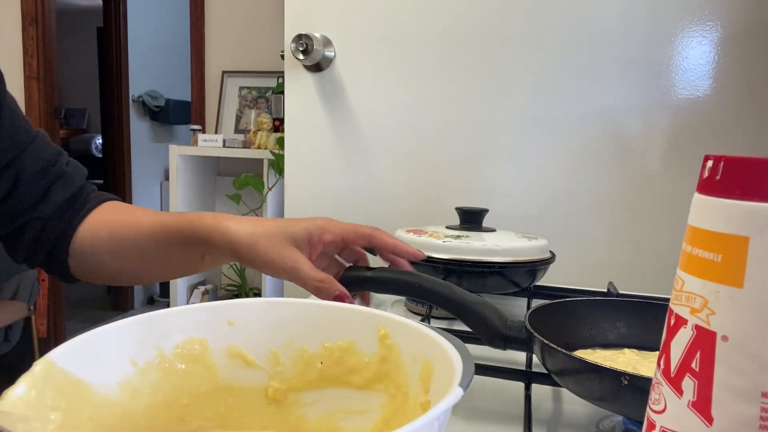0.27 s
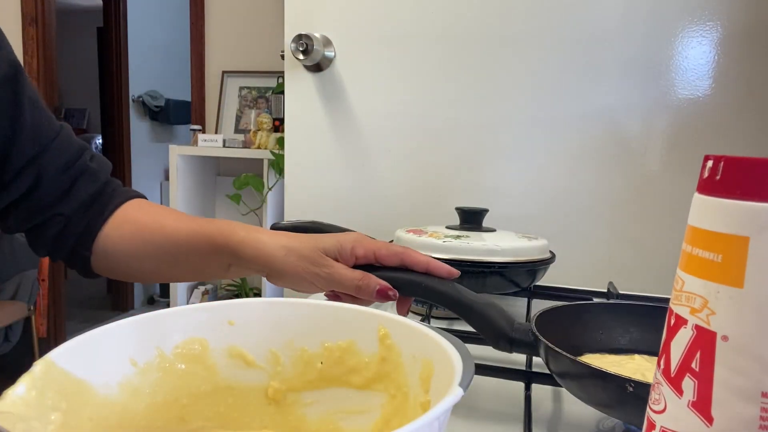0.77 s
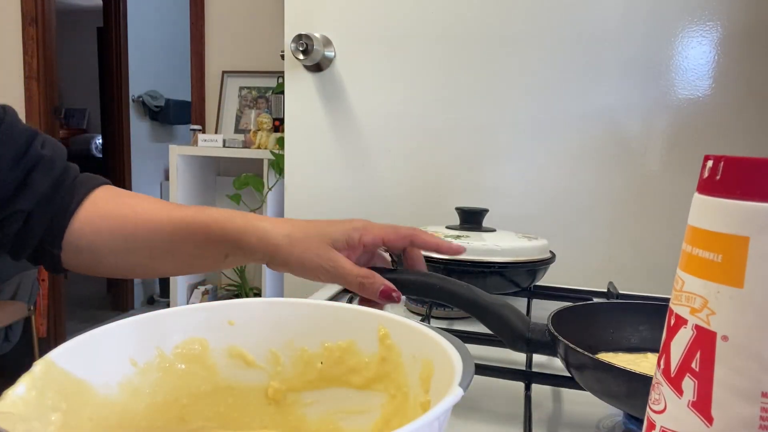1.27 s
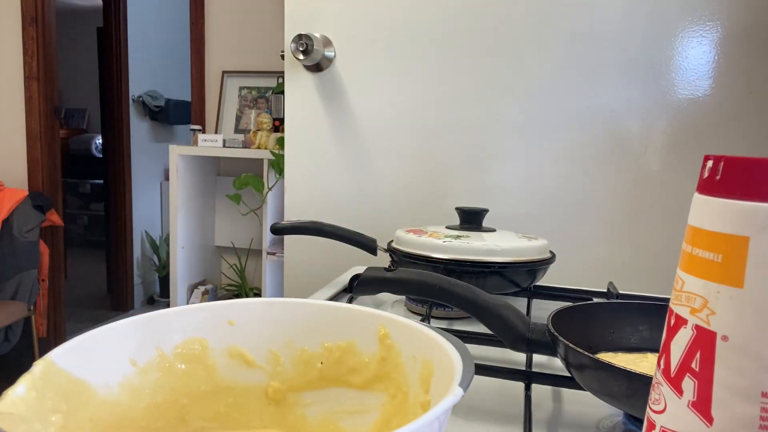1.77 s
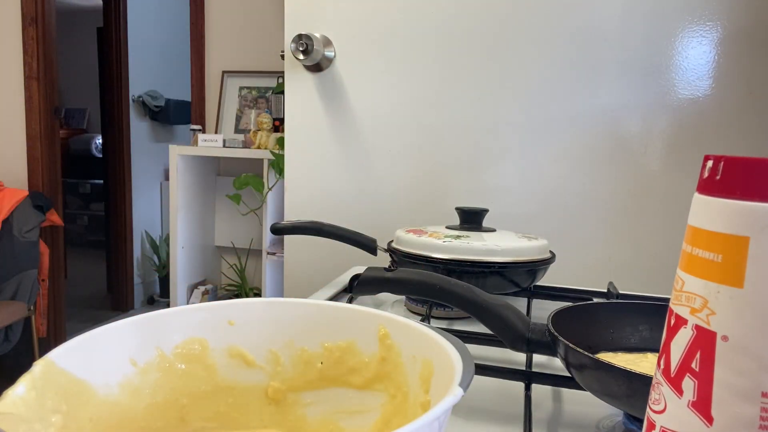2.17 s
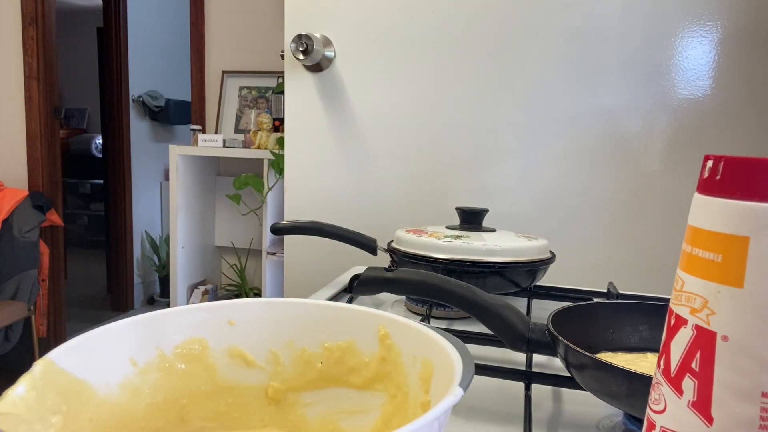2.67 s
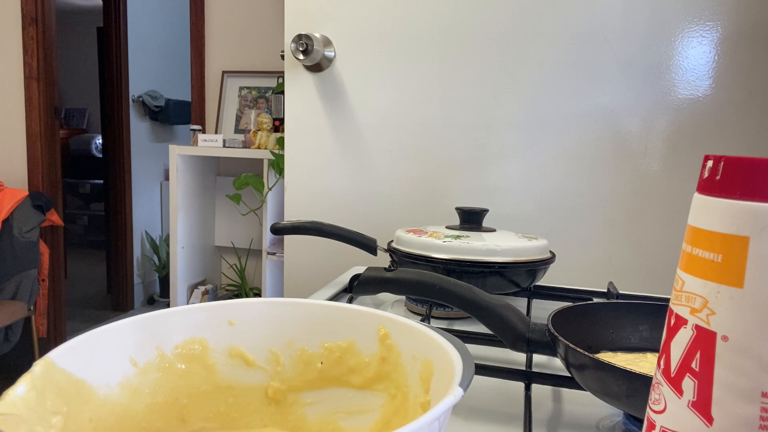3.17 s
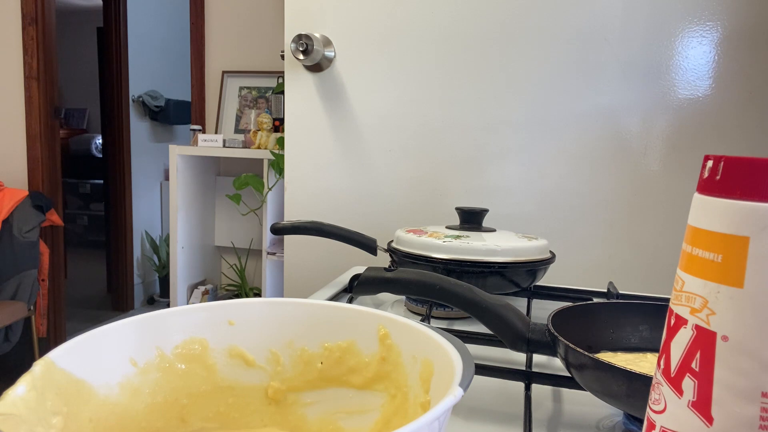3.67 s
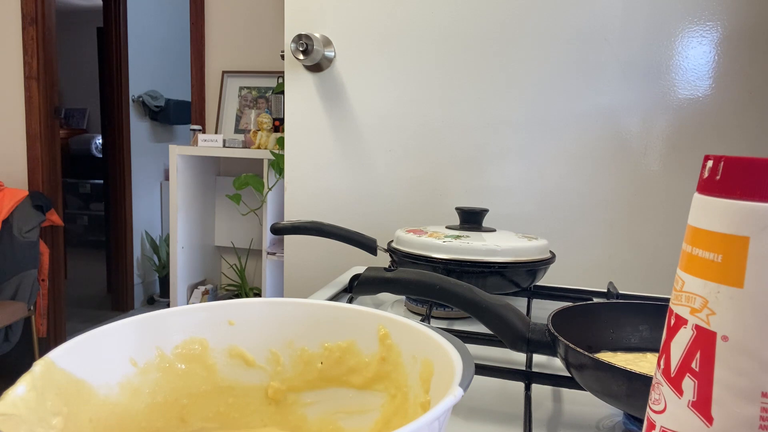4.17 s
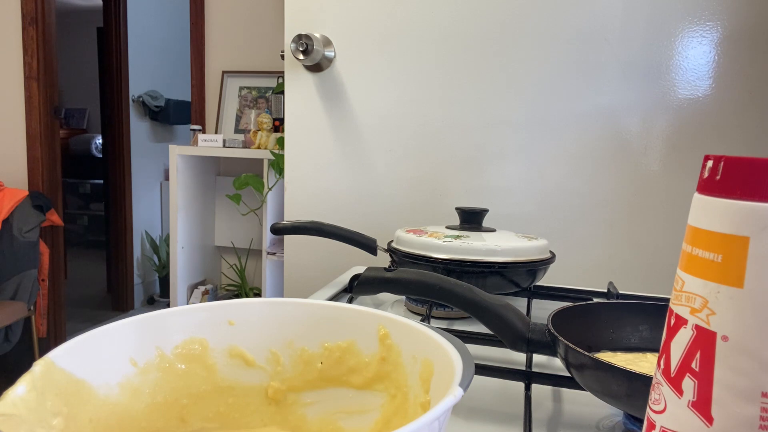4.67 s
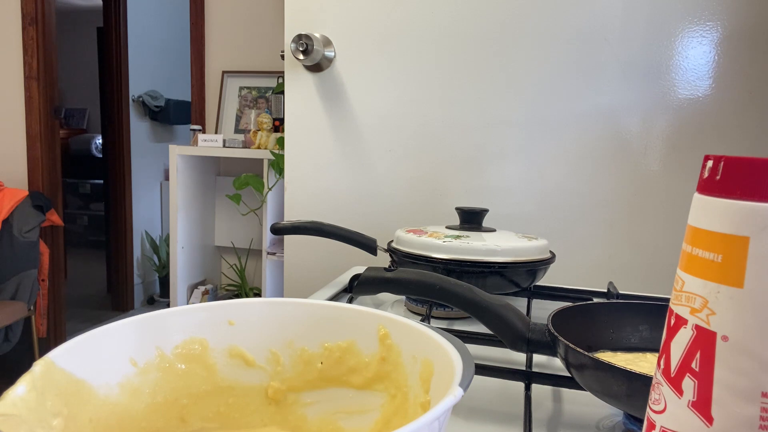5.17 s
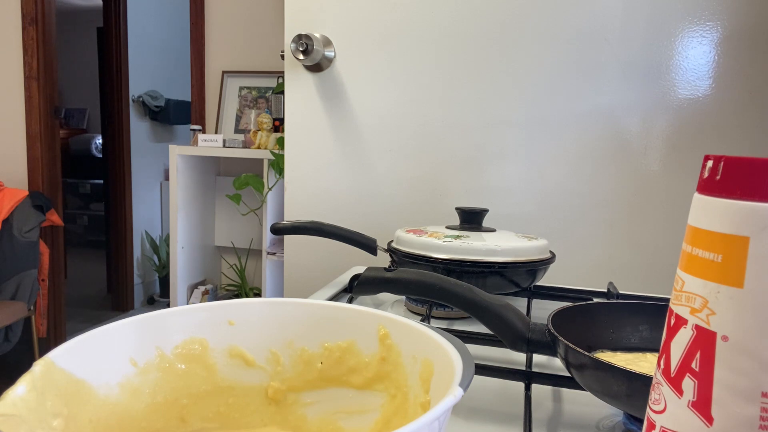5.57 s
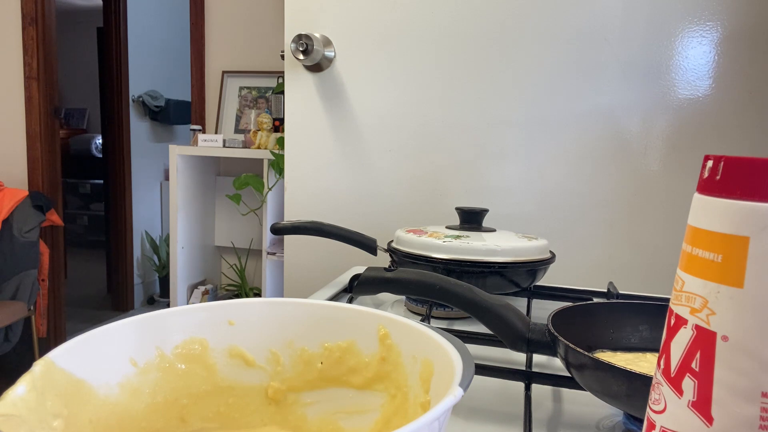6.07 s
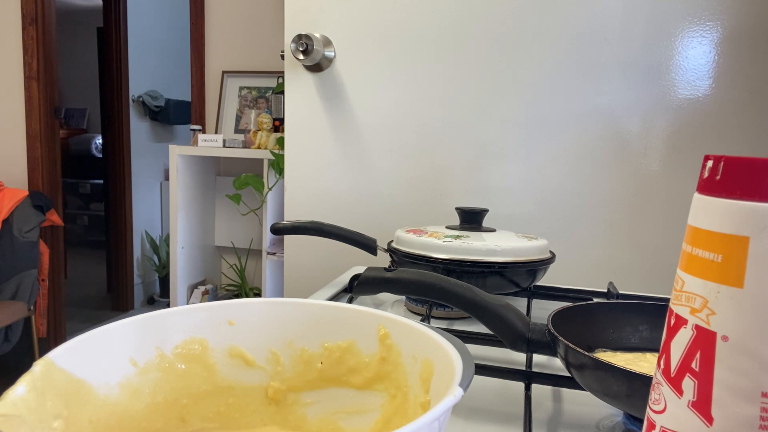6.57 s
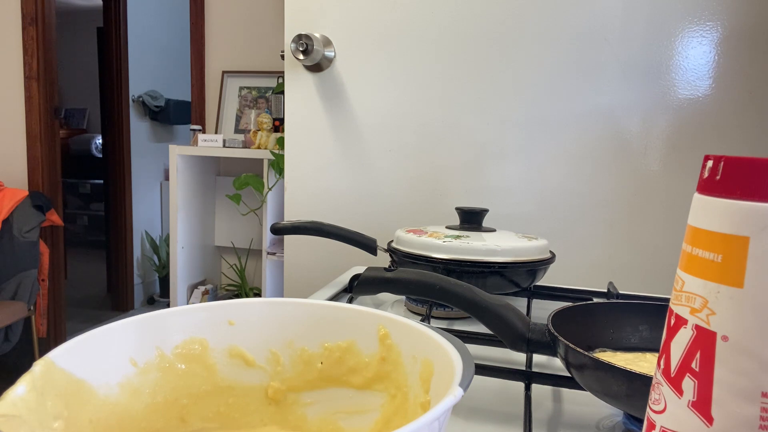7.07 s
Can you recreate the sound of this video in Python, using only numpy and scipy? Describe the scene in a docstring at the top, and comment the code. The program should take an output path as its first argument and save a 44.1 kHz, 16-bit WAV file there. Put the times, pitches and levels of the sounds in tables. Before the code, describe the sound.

Batter sizzles softly in a pan with sharp pops of fat and a cookware clatter, over a gas flame and a low motor drone.

```python
"""Pancake frying on a gas stove

Batter sizzles softly as steam escapes; now and then a bubble of fat bursts with a sharp snap.
A hand bumps the pan handle, something hollow is nudged, cookware is set down with a clatter across
the small kitchen, and a utensil clinks. Under it all the burner rushes and a distant motor drones,
slowly changing its speed."""
import sys
import numpy as np
from scipy import signal
from scipy.fft import rfft, irfft
from scipy.io import wavfile
from scipy.ndimage import uniform_filter1d

SR = 44100
rng = np.random.default_rng(int(sys.argv[2]) if len(sys.argv) > 2 else 0)


def pcm_store(signal):
    """Save signal as 16-bit PCM."""
    levels = np.round(np.clip(np.atleast_2d(signal), -1, 1) * 32767)
    wavfile.write(sys.argv[1], SR, levels.astype(np.int16).T)


N = 323246
TIME = np.arange(N) / SR


def amp(db):
    """Turns decibels into a number to multiply by."""
    return 10 ** (np.asarray(db) / 20)


def evened(x):
    """Scales a signal to an average size (rms) of 1."""
    return x / np.sqrt(np.mean(x ** 2) + 1e-20)


def read(points, hz):
    """Looks up a table by frequency, sliding smoothly between its rows."""
    f, value = np.transpose(points)
    return np.interp(np.log(hz + 1), np.log(f + 1), value)


def follow(rows):
    """Turns a table of times and values into one curve per column."""
    s, *columns = np.transpose(rows)
    return [np.interp(TIME, s, c) for c in columns]


def add(mix, s, sound):
    """Mixes a sound in at s seconds."""
    part = mix[..., max(round(s * SR), 0):][..., :sound.shape[-1]]
    part += sound[..., :part.shape[-1]]


def drift(per_s):
    """A random wobble of size 1, with up to about per_s swings a second."""
    hz = np.fft.rfftfreq(N, 1 / SR)
    return evened(irfft(rfft(rng.standard_normal(N)) / (1 + (hz / per_s) ** 4), N))


def colour(x, points):
    """Turns each frequency up or down as a table says."""
    size = x.shape[-1]
    return irfft(rfft(x) * amp(read(points, np.fft.rfftfreq(size, 1 / SR))), size)


def resonate(x, pitch_hz, width_hz):
    """Keeps mostly the part of a sound near one pitch."""
    size = x.shape[-1]
    hz = np.fft.rfftfreq(size, 1 / SR)
    return irfft(rfft(x) / (1 + ((hz - pitch_hz) / (width_hz / 2)) ** 2), size)


def flattened(x, size):
    """Makes a burst about equally strong from bass to treble, keeping its fine detail."""
    z = rfft(x)
    power = abs(uniform_filter1d(abs(z) ** 2, size, axis=-1))
    return irfft(z / np.sqrt(power + 1e-12), x.shape[-1])


def click(points, dull_hz=SR):
    """A sudden click with a table's tone, fading away above dull_hz."""
    hz = abs(np.fft.fftfreq(2048, 1 / SR))
    log_gain = np.log(amp(read(points, hz)) / np.sqrt(1 + (hz / dull_hz) ** 4) + 1e-5)
    return np.fft.ifft(np.exp(np.conj(signal.hilbert(log_gain)))).real


# How alike the stove sounds left and right (frequency [Hz], likeness [0 to 1])
LIKENESS = [(160, .98), (290, .7), (600, .2), (3500, .2), (5500, .5), (7500, .85), (9000, .96),
            (16000, .93)]
# How far the left side runs ahead (frequency [Hz], lead [radians])
LEFT_LEAD = [(300, -.1), (1800, -2.4), (4200, 0), (5600, -1.7), (6600, -.1), (9300, 0), (12000, 1.5),
             (14000, 2.7), (16000, 3.3)]
# How much louder the left side is (frequency [Hz], left minus right [dB])
BALANCE = [(100, 3.5), (350, -1), (1000, -0.5), (3100, 1.5), (4500, 1), (6800, -0.5), (9000, 0),
           (16000, 0.5)]
def stereo(a, b):
    """Blends two sounds into left and right, most alike in the bass and high treble."""
    hz = np.fft.rfftfreq(N, 1 / SR)
    same, tilt = read(LIKENESS, hz), amp(read(BALANCE, hz) / 2)
    right = (same * rfft(a) + np.sqrt(1 - same ** 2) * rfft(b)) * np.exp(-1j * read(LEFT_LEAD, hz))
    return irfft(np.array([rfft(a) * tilt, right / tilt]), N)


def from_right(x):
    """Sound from the right reaches the left side late, by a quarter cycle from 600 Hz up."""
    lag = np.minimum(np.fft.rfftfreq(N, 1 / SR) / 600, 1) * np.pi / 4
    return irfft(rfft(x) * np.exp(1j * lag * np.array([[-1], [1]])), N)


# How long the room echoes (frequency [Hz], time to fade by 60 dB [s])
ECHO_TIMES = [(100, .28), (350, .28), (1000, .34), (3000, .4), (7000, .38), (15000, .25)]
def kitchen(x, early_s=0.16, mono_hz=380):
    """Strong early echoes off stove and wall, then a fading tail; both sides share the bass."""
    t = np.arange(SR * 3 // 4) / SR
    echoes = rng.standard_normal((2, len(t))) * (1 + np.exp(-t / early_s))
    hz, at, (left, right) = signal.stft(echoes, SR, nperseg=256)
    same = 1 / (1 + (hz[:, None] / mono_hz) ** 4)
    right = same * left + np.sqrt(1 - same ** 2) * right
    fade = amp(-60 * at / read(ECHO_TIMES, hz)[:, None])
    tail = signal.istft(np.array([left, right]) * fade, SR, nperseg=256)[1][:, :len(t)]
    tail = flattened(tail, size=24) * np.minimum(t / 0.0012, 1)
    return signal.fftconvolve(x[None], tail[:, :SR // 2], axes=1)[:, :N]


# The tone of the hiss (frequency [Hz], level [dB])
SIZZLE_TONE = [(2000, -1.5), (4000, -1.5), (5600, -2), (7000, 0.5), (7800, -1), (9000, -2), (11500, -4),
               (12800, -3.5), (13800, -4.5), (15500, -36), (16300, -45)]
# How hard the batter sizzles (time [s], level [dB])
FRYING = [(0.0, -60.5), (0.59, -61.5), (1.2, -59), (1.65, -62), (2.06, -59), (2.88, -61.5), (3.35, -59),
          (3.86, -58.5), (4.33, -62.5), (4.9, -59.5), (5.88, -61.5), (6.2, -58.5), (6.72, -60), (7.33, -58)]
def sizzle(gain_db=2, bubbles_per_s=900, spread_db=3.5, flutter_db=0.6):
    """Countless tiny steam bubbles merge into a hiss; the larger ones prickle out of it."""
    size = amp(spread_db * np.minimum(rng.exponential(1, (2, N)), 6)) * rng.choice([-1, 1], (2, N))
    prickles = evened(size * (rng.random((2, N)) < bubbles_per_s / SR))
    fizz = colour(rng.standard_normal((2, N)) + amp(-3) * prickles, SIZZLE_TONE)
    return evened(stereo(*fizz)) * amp(follow(FRYING)[0] + gain_db + flutter_db * drift(14))


# The tone of the flame (frequency [Hz], level [dB])
FLAME_TONE = [(260, -1), (450, -12), (600, -1.5), (820, -4), (1080, 0), (1450, -3.5), (1800, -6.5),
              (2060, -8), (2500, -4), (3300, -6), (3900, -14.5), (5000, -11.5), (6500, -32), (11000, -78)]
# Hollow spaces round the flame (pitch [Hz], width [Hz], level [dB])
STOVE_HOLLOWS = [(1100, 75, 1.5), (1520, 28, -1), (1790, 36, -1), (2280, 110, -4), (2470, 120, -2),
                 (3310, 260, -9)]
# The tone of the house's rumble (frequency [Hz], level [dB])
RUMBLE_TONE = [(20, -12), (33, -6), (45, -1.5), (58, 1.5), (80, 4.5), (125, -1), (170, -13.5), (280, -10.5),
               (420, -17), (700, -44), (1500, -69)]
def burner(rush_db=-58, rumble_db=-48.5, flutter_db=1.7, flicker_db=2.3):
    """The gas flame rushes and flickers in the stove's hollows, over the low rumble of the house."""
    flame = rng.standard_normal((2, N))
    hollows = sum(resonate(flame, hz, width) * amp(db + flicker_db * drift(12))
                  for hz, width, db in STOVE_HOLLOWS)
    rush = evened(colour(rng.standard_normal((2, N)), FLAME_TONE)) + amp(-5) * evened(hollows)
    rumble = evened(stereo(*colour(rng.standard_normal((2, N)), RUMBLE_TONE)))
    return stereo(*rush) * amp(rush_db + flutter_db * drift(6.6)) + rumble * amp(rumble_db)


def hum(hz, db, waver_hz=0.76, waver_db=1.5):
    """A low tone that wavers in pitch and loudness."""
    loudness = amp(db + waver_db * drift(6.3))
    return loudness * np.sin(2 * np.pi * np.cumsum(hz + waver_hz * drift(14)) / SR)


# The opening hums (starting pitch [Hz], glide [Hz/s], starting level [dB], fade [dB/s])
DYING_HUMS = [(75, -19.5, -34, 30.5), (129.5, 13.5, -43.5, 15)]
def dying_hums():
    """Two hums slide in pitch, one down and one up, as they die away."""
    return sum(hum(hz + glide * TIME, db - fade * TIME) for hz, glide, db, fade in DYING_HUMS)


# The motor, louder when hard work slows it down (time [s], pitch [Hz], level [dB])
MOTOR = [(.6, 110, -49.5), (1.3, 113, -47.5), (2.9, 110.7, -47), (3.9, 106, -41), (5, 103.6, -36),
         (5.8, 105.4, -38.5), (6.7, 107.6, -39), (7.33, 104.4, -39)]
# Its higher tones (multiple of the pitch [times], level [dB])
OVERTONES = [(2, 1), (3, -3.5), (4, -6)]
# Those tones and the growl rise as it strains (time [s], level [dB])
STRAIN = [(5.1, -73), (6.3, -60.5), (7.33, -55)]
# Weaker hums (pitch [Hz], level at light work [dB], level at hard work [dB])
WEAK_HUMS = [(74.3, -57.5, -47), (92, -53.5, -48.5), (175, -73.5, -53.5)]
# The tone of its rough growl (frequency [Hz], level [dB])
GROWL_TONE = [(40, -20), (80, -5), (170, 6), (280, -22.5), (420, -10), (650, -34), (1500, -60)]
def motor(waver_hz=0.76, right_db=2.5, growl_db=8):
    """A distant motor drones and growls; weaker hums throb against it."""
    hz, db = follow(MOTOR)
    load, strain_db = (db - db.min()) / np.ptp(db), follow(STRAIN)[0]
    angle = 2 * np.pi * np.cumsum(hz + waver_hz * drift(6.7)) / SR
    drone = amp(db + drift(4.4)) * np.sin(angle)
    drone += sum(amp(strain_db + d + 2 * drift(8)) * np.sin(k * angle) for k, d in OVERTONES)
    for hum_hz, light_db, hard_db in WEAK_HUMS:
        drone += hum(hum_hz, light_db + load * (hard_db - light_db))
    drone *= np.clip((TIME - MOTOR[0][0]) * 10, 0, 1)  # fades in over 0.1 s
    drone += dying_hums()
    growl = evened(stereo(*colour(rng.standard_normal((2, N)), GROWL_TONE))) * amp(strain_db + growl_db)
    return np.sqrt(2) * drone * amp([[-right_db / 2], [right_db / 2]]) + growl


def spits(level_db=-69, count=90, spread_db=5, length_s=0.017):
    """Steam escapes through tiny holes in the batter in short fizzes."""
    out, t = np.zeros(N), np.arange(SR // 8) / SR
    swell = t / length_s * np.exp(-2 * t / length_s)
    for when, pitch, size in rng.random((count, 3)):
        fizz = evened(resonate(rng.standard_normal(len(t)), 3000 * 4 ** pitch, width_hz=3500))
        add(out, when * N / SR, amp(spread_db * size) * fizz * swell)
    return amp(level_db) * evened(stereo(out, out))


def small_pops(count=16, level_db=-43.5, spread_db=12, body_db=-15):
    """Rows for faint pops, scattered about evenly through the frying."""
    return [((k + when) / count * N / SR, level_db + spread_db * (2 * size - 1), body_db)
            for k, (when, size) in enumerate(rng.random((count, 2)))]


# The main bursting bubbles (time [s], level [dB], dull body compared with the snap [dB])
POPS = [(0.155, -29, -9), (0.245, -34.5, 5), (0.3967, -12.5, -6), (0.906, -48, 1), (1.124, -32, -9),
        (1.4825, -25, 0), (1.863, -35, -8), (2.096, -29, -2), (2.1426, -19, 9), (3.7373, -24, 5),
        (3.942, -30, 3), (4.007, -32, -12), (4.036, -38, 2), (4.2536, -29, -14), (5.294, -31, -2),
        (5.3077, -22, -10), (5.56, -22, -45), (5.8015, -37, -10), (6.4425, -14.5, -10), (6.549, -31, -21),
        (6.9146, -21.5, -16), (7.048, -36, -9), (7.1164, -21, -23), (7.2625, -28.5, 21)]
# The tone of a pop heard directly (frequency [Hz], level [dB])
SNAP_TONE = [(300, 3.5), (700, -2), (1250, 4), (1800, -11), (3000, -4), (4500, 5), (7000, 10.5),
             (9000, 4.5), (12800, 6), (16000, 2)]
# Its tone as the pan throws it into the room (frequency [Hz], level [dB])
THROWN_TONE = [(300, -24), (1200, 11), (2400, 3.5), (3050, 9.5), (3800, 9), (7000, 14), (9500, 11),
               (12500, 3.5), (14000, -10), (16000, -20)]
def pops(gain_db=6, room_db=-5, delay_s=0.001127, spray_s=0.0013):
    """A bubble of fat bursts with a snap and a brief spray; the pan throws the sound into the room."""
    direct, thrown, t = np.zeros((2, N)), np.zeros(N), np.arange(256) / SR
    for s, db, body_db in POPS + small_pops():
        spray = 0.22 * rng.standard_normal((2, len(t))) * np.exp(-t / spray_s)
        burst = amp(db + gain_db) * flattened(spray + (t == 0), size=24)[:, :192]
        snap = click(SNAP_TONE) + amp(body_db) * click(SNAP_TONE, dull_hz=3900)
        splash = click(THROWN_TONE) + amp(body_db) * click(THROWN_TONE, dull_hz=4400)
        add(direct, s + delay_s, signal.fftconvolve(burst, snap[None] / np.linalg.norm(snap), axes=1))
        add(thrown, s + delay_s, np.convolve(burst[0], splash / np.linalg.norm(splash)))
    heard = stereo(*direct) + amp(room_db) * kitchen(thrown)
    return signal.lfilter(*signal.butter(2, 350, "high", fs=SR), heard)  # too small to make bass


def jet(pitch_hz, peak_s):
    """Steam swells and fades in one hole, hissing near its pitch; two channels."""
    t = np.arange(SR // 4) / SR
    hiss = [evened(resonate(noise, pitch_hz, 0.24 * pitch_hz))
            for noise in rng.standard_normal((2, len(t)))]
    return np.array(hiss) * t / peak_s * np.exp(1 - t / peak_s)


# Larger jets of steam (time [s], level [dB], pitch [Hz], time to the peak [s])
SQUIRTS = [(0.412, -49, 3040, 0.013), (1.02, -55, 1370, .02), (1.19, -60, 4460, 0.027),
           (1.855, -58, 10600, 0.014), (2.31, -60, 2440, 0.029), (2.66, -61, 3240, 0.025),
           (2.96, -59, 1330, 0.047), (3.08, -63, 3370, .03), (4.01, -54.5, 1240, 0.015),
           (4.41, -60, 3600, .025), (4.52, -58, 7000, .012), (5.04, -58, 1400, 0.019),
           (5.47, -53, 10500, 0.01), (6.276, -58, 10070, 0.0073)]
def squirts(puff_count=45, puff_db=-66, spread_db=8):
    """A few large holes let out clear jets of steam; many soft puffs come from under the batter."""
    jets, puffs = np.zeros((2, N)), np.zeros((2, N))
    for s, db, hz, peak_s in SQUIRTS:
        add(jets, s, amp(db) * jet(hz, peak_s))
    for k, (when, pitch, size) in enumerate(rng.random((puff_count, 3))):
        puff = amp(spread_db * size) * jet(1100 * 3.3 ** pitch, peak_s=0.032)
        add(puffs, (k + when) / puff_count * N / SR, puff)
    return stereo(*(jets + amp(puff_db) * evened(puffs)))


def fading_tones(tones, t):
    """A struck object rings with several tones; each drops 60 dB in its ring time."""
    return sum(amp(db - 60 * t / ring_s) * np.sin(2 * np.pi * hz * t) for hz, db, ring_s in tones)


def ring(tones):
    """Half a second of ringing, scaled to an energy of 1."""
    sound = fading_tones(tones, np.arange(SR // 2) / SR)
    return sound / np.linalg.norm(sound)


def struck(blows, body, rattle):
    """Each blow is a push and a brief rattle that sound through an object's body."""
    out, t = np.zeros(N), np.arange(SR // 4) / SR
    for s, db, low_hz, dull_hz, length in blows:
        contacts = rng.standard_normal(len(t)) * amp(-30 * t / length) * (1 - np.exp(-6 * t / length))
        force = flattened(rattle * contacts / np.linalg.norm(contacts) + (t == 0), size=20)[:len(t) // 2]
        force = signal.lfilter(*signal.butter(2, low_hz, "high", fs=SR), force)  # light blows lack bass
        force = signal.lfilter(*signal.butter(2, dull_hz, fs=SR), force)  # soft ones lack treble
        blow = signal.fftconvolve(force, body)
        add(out, s, amp(db) * blow / np.linalg.norm(blow))
    return out


# The tone of a thud (frequency [Hz], level [dB])
THUD_TONE = [(40, 0), (90, 1), (150, 3), (195, -2), (240, 2), (300, -1), (400, 4), (540, -5), (700, -5),
             (900, -1), (1100, -9), (1280, -6), (1500, -13), (1850, -14), (2100, -7), (2600, -16),
             (3100, -13), (4000, -20), (6600, -15), (9000, -22), (13000, -25)]
def thud():
    """The dull part of a blow on cookware."""
    return click(THUD_TONE)


# The pan shifting (time [s], level [dB], bass limit [Hz], treble limit [Hz], rattle length [s])
NUDGES = [(0.55, -51, 1018, 1190, 0.22), (0.629, -40.5, 380, 1020, 0.038), (0.659, -45, 1690, 7600, 0.029),
          (0.669, -33.5, 70, 230, 0.026), (0.729, -47.5, 800, 6500, 0.026), (0.736, -39, 80.5, 220, 0.018),
          (0.756, -52, 900, 3000, 0.012), (0.774, -46.5, 520, 600, 0.016), (0.797, -49.5, 520, 620, 0.0096)]
# The tones of the pan on its grate (pitch [Hz], level [dB], ring time [s])
PAN_TONES = [(150, -2, .08), (245, -6, .08), (393, -6, .07), (540, -6, .05), (650, 0, .06), (834, -5, .05),
             (1010, -5, .04), (1810, -7, .04), (2220, -5, .012), (2530, -11, .03), (3100, -7, .01),
             (3750, -2, .01), (5200, -8, .004)]
def pan_handle(gain_db=30):
    """A hand bumps the handle, and the pan knocks and scrapes on the grate."""
    body, knock = ring(PAN_TONES), thud()
    add(body, 0, amp(-1) * knock / np.linalg.norm(knock))
    out = amp(gain_db) * struck(NUDGES, body, rattle=3)
    return amp(1) * from_right(out) + kitchen(out)


# Soft shoves (time [s], level [dB], bass limit [Hz], treble limit [Hz], rattle length [s])
BUMPS = [(2.96, -47, 200.7, 260, 0.09), (3.202, -46, 194, 322, 0.012), (3.491, -35.5, 120.2, 162, 0.066),
         (3.532, -38.5, 110, 249.3, 0.042), (3.545, -49.5, 500, 2600, 0.025),
         (3.612, -33, 374, 2000, 0.058), (6.886, -48.5, 557, 846, 0.018)]
# The tones of the hollow thing (pitch [Hz], level [dB], ring time [s])
HOLLOW_TONES = [(150, -4, .09), (215, 0, .08), (290, -2, .05), (390, -4, .05), (528, -2, .06),
                (590, -6, .04), (872, -8, .1), (974, -5, .06), (1320, -12, .06), (1610, -15, .03),
                (2600, -12, .02)]
def bumps(gain_db=30):
    """Soft bumps make something hollow ring briefly."""
    out = amp(gain_db) * struck(BUMPS, ring(HOLLOW_TONES), rattle=5)
    return from_right(out) + kitchen(out)


# Cookware lands on its rim, falls flat and bounces; later comes a light knock
# (time [s], level [dB], bass limit [Hz], treble limit [Hz], rattle length [s])
LANDINGS = [(3.7445, -32.5, 1400, 2600, 0.0081), (3.7485, -20, 130, 650, 0.0057),
            (3.7532, -22, 326, 4420, 0.014), (3.765, -26, 447, 1600, 0.015), (3.7765, -26, 80, 600, .004),
            (3.803, -29.5, 200, 1500, 0.0049), (3.829, -37, 150, 600, .008), (3.866, -34, 60, 160, 0.0062),
            (6.886, -45, 485, 725, 0.015)]
# The tones of the cookware (pitch [Hz], level [dB], ring time [s])
COOKWARE_TONES = [(151, 1, .22), (240, 0, .28), (272, -5, .33), (357, -1, .3), (380, -4, .24),
                  (414, -1, .22), (560, -14, .3), (632, -10, .21), (686, -12, .3), (772, -11, .24),
                  (885, -11, .32), (962, -8, .26), (1220, -17, .25), (1314, -16, .3), (1680, -19, .26),
                  (2076, -9.5, .42), (2098, -16, .36), (2135, -18, .3), (3200, -19, .33), (3671, -23, .25),
                  (6368, -26, .35)]
def cookware(gain_db=28, ring_db=2, rise_s=0.0016, right_db=1):
    """Cookware thuds down, and the hardest blow leaves it ringing."""
    thuds = struck(LANDINGS, thud(), rattle=2.09)
    ringing, t = np.zeros(N), np.arange(SR // 2) / SR
    s, hardest_db = max(LANDINGS, key=lambda row: row[1])[:2]
    tones = sum(amp(db - 60 * t / ring_s) * np.sin(2 * np.pi * (hz * t + rng.random()))
                for hz, db, ring_s in COOKWARE_TONES)
    add(ringing, s, amp(hardest_db) * tones / np.linalg.norm(tones) * np.minimum(t / rise_s, 1))
    direct = from_right(amp(1) * thuds + amp(ring_db) * ringing)
    return amp(gain_db) * (direct + amp(-1) * kitchen(thuds)) * amp([[0], [right_db]])


# Light touches (time [s], level [dB], treble limit [Hz], scrape length [s], lowest tone [Hz])
CLINKS = [(4.908, -42, 9470, 0.014, 1635), (5.362, -44.5, 1720, 0.001, 1726),
          (5.965, -39.5, 3094, 0.066, 1720), (6.146, -46, 4570, 0.028, 1676),
          (6.423, -45, 1710, 0.001, 1740)]
# The utensil's higher tones (pitch [Hz], level [dB], ring time [s])
UTENSIL_TONES = [(3035, -3, .08), (4750, 0, .028), (6270, -11, .05), (7250, -3, .03), (7680, -6, .08),
                 (10100, -7, .03), (11900, -2, .04)]
def utensil(gain_db=28, room_db=-3, rise_s=0.003):
    """Short touches make a small utensil ring; longer ones mostly scrape."""
    out, t = np.zeros(N), np.arange(SR // 2) / SR
    for s, db, dull_hz, length, lowest_hz in CLINKS:
        scrape = amp(3) * np.sqrt(length / 0.03) * rng.standard_normal(len(t)) * np.exp(-t / length)
        tones = fading_tones([(lowest_hz, -7, 0.13)] + UTENSIL_TONES, t)
        tap = (tones + scrape) * np.minimum(t / rise_s, 1)
        soften = signal.butter(2, [1000, dull_hz], "band", fs=SR)
        add(out, s, amp(db + gain_db) * signal.lfilter(*soften, tap / np.linalg.norm(tap)))
    return amp(room_db) * kitchen(out) + out


def scene():
    """Everything heard beside the stove."""
    frying = sizzle() + spits() + squirts() + pops()
    clatter = pan_handle() + bumps() + cookware() + utensil()
    return frying + clatter + motor() + burner()


def record(dry):
    """Cuts off the very highest treble, above 16300 Hz."""
    treble_cut = signal.firwin(511, 16300, window=("kaiser", 9), fs=SR)
    return signal.oaconvolve(dry, treble_cut[None], "same")


dry = scene()
out = record(dry)
pcm_store(out)
```